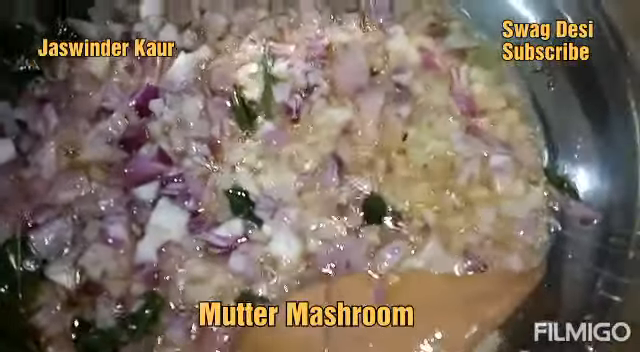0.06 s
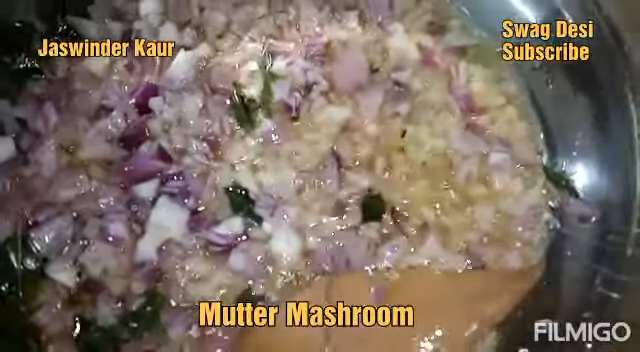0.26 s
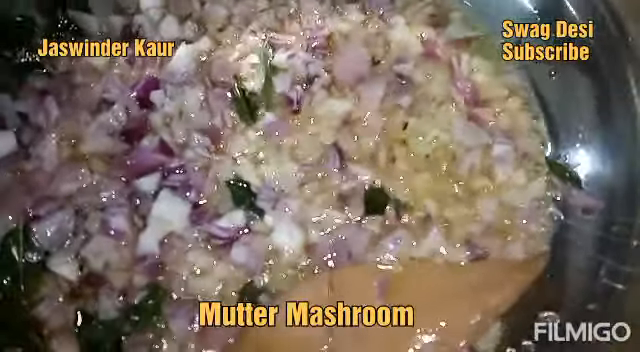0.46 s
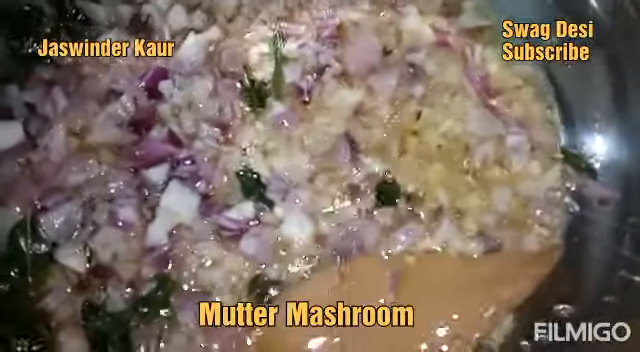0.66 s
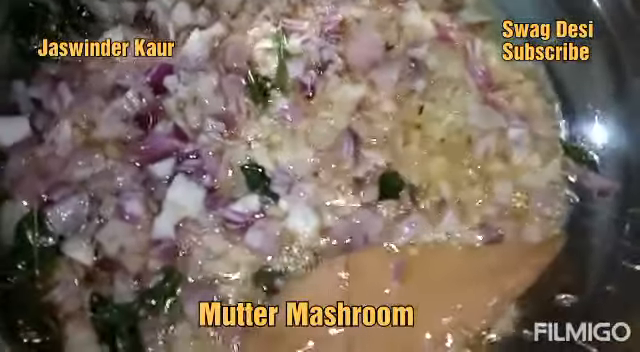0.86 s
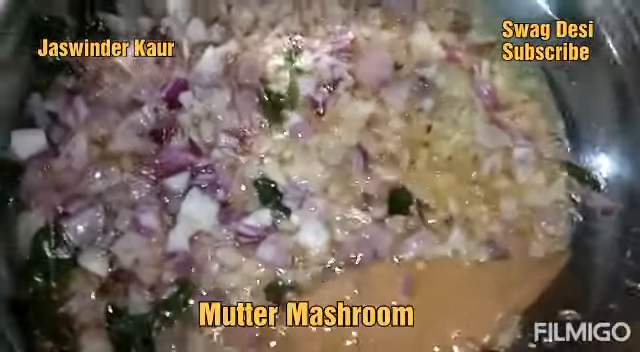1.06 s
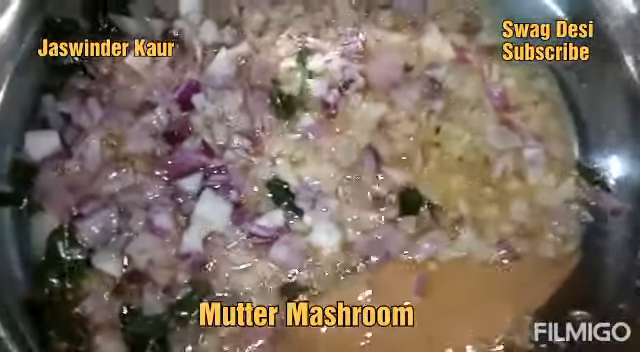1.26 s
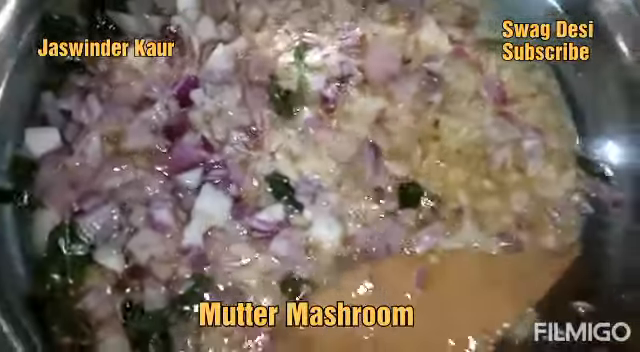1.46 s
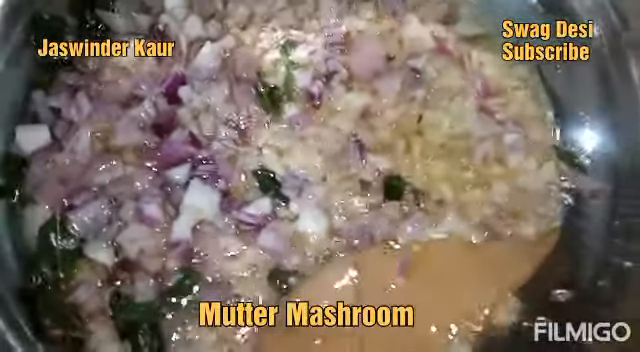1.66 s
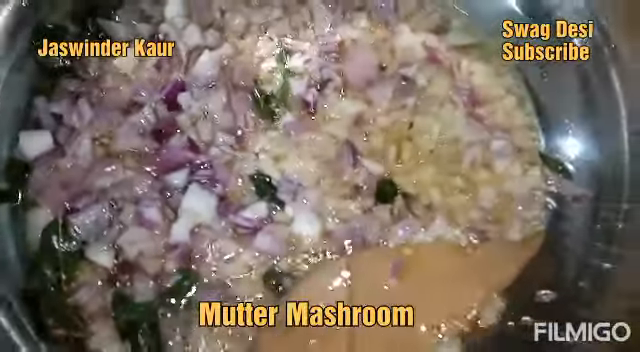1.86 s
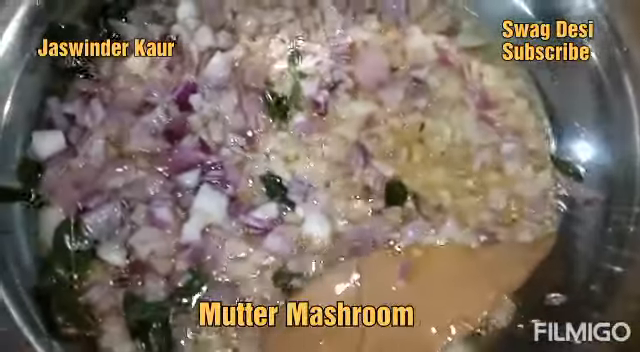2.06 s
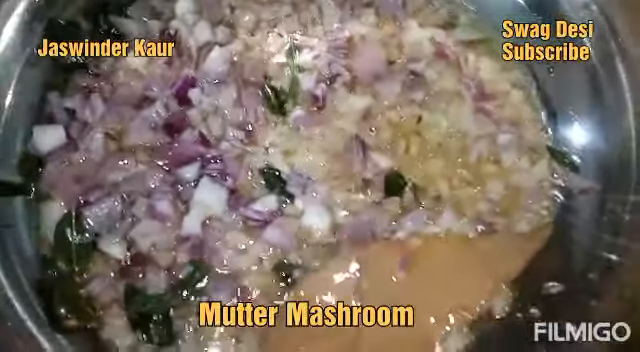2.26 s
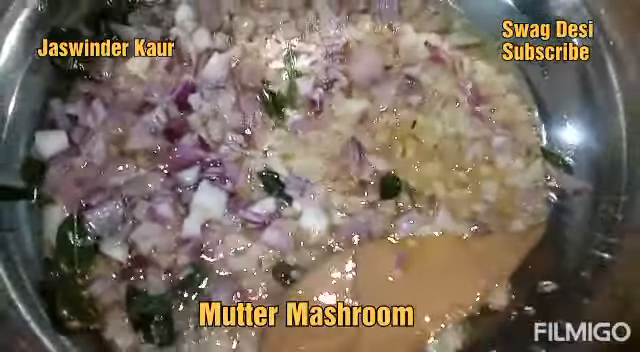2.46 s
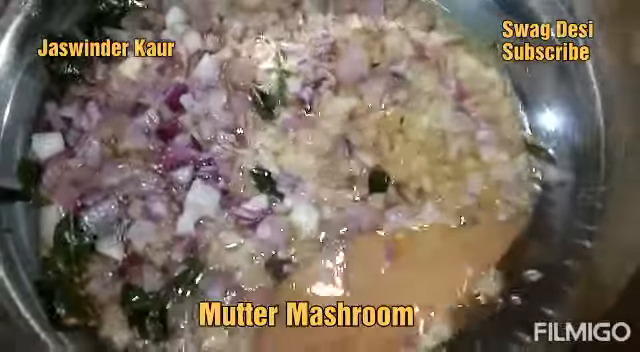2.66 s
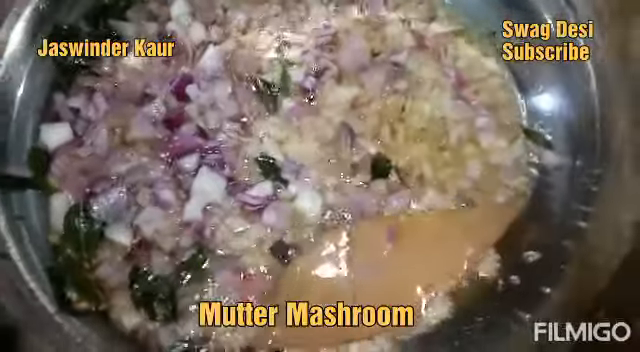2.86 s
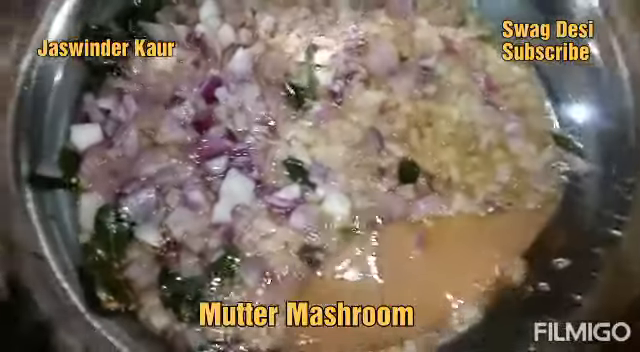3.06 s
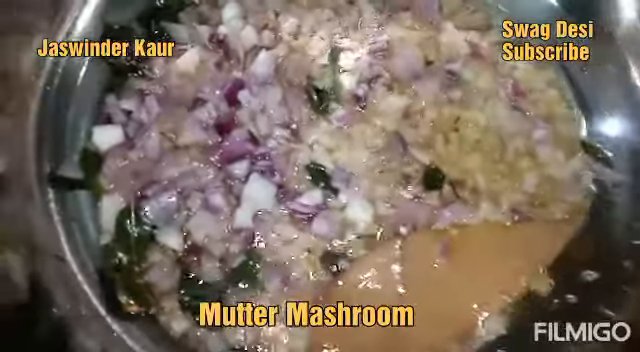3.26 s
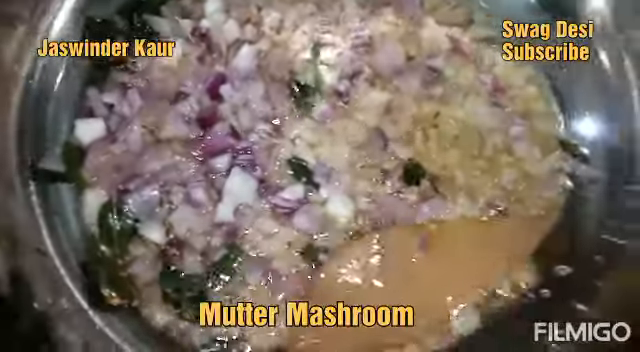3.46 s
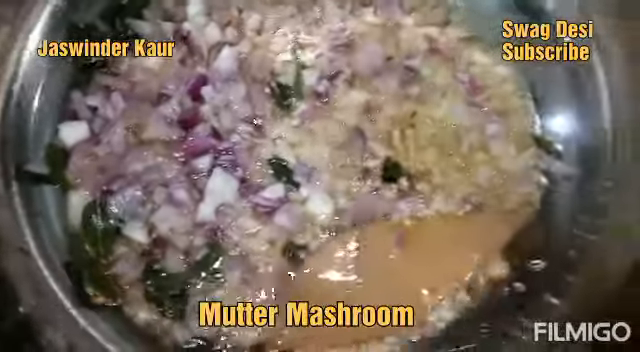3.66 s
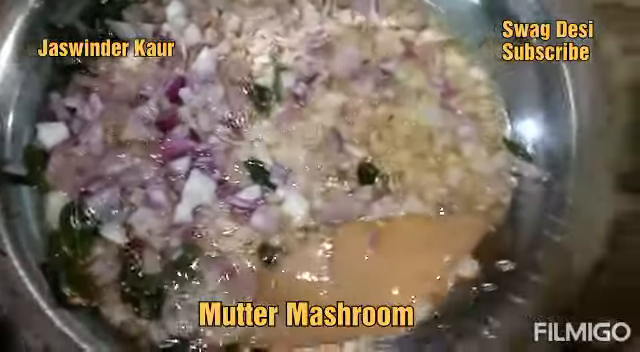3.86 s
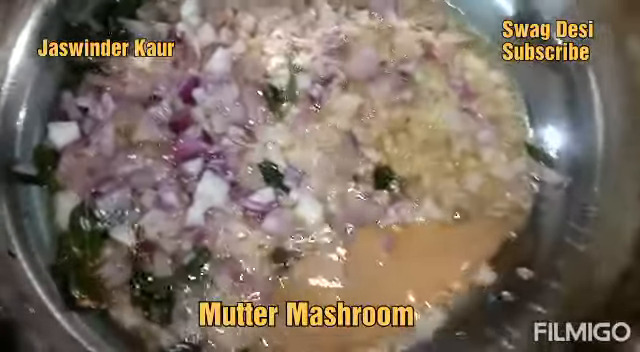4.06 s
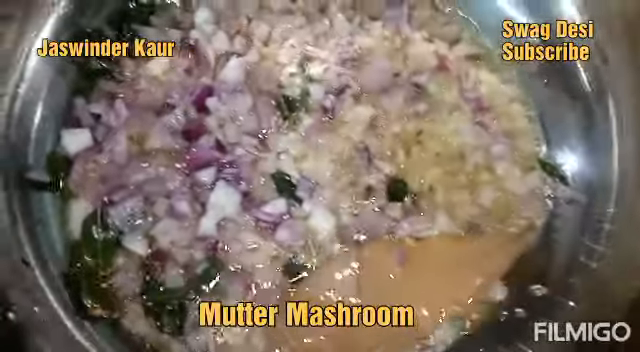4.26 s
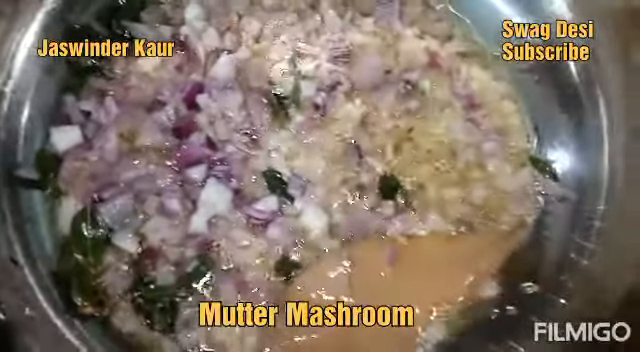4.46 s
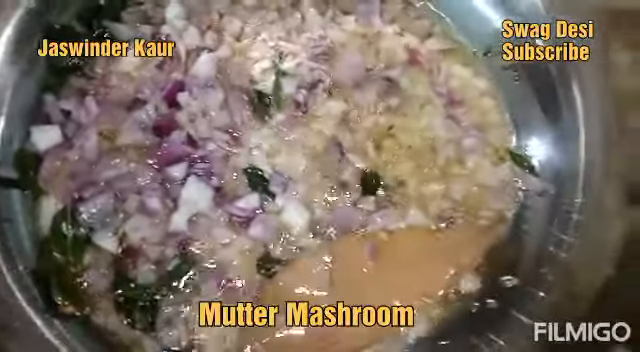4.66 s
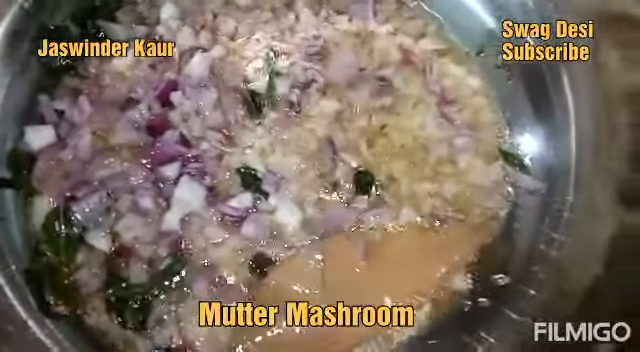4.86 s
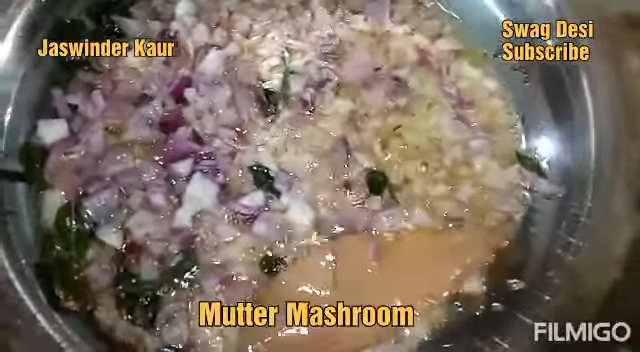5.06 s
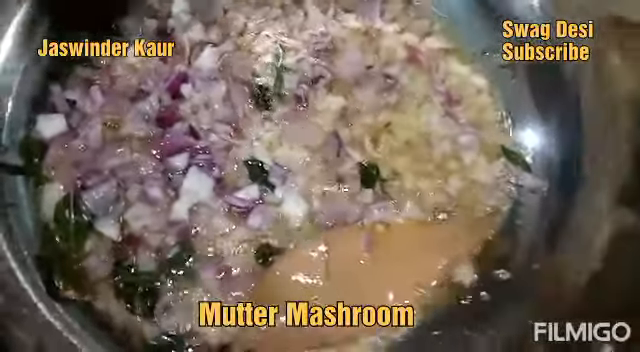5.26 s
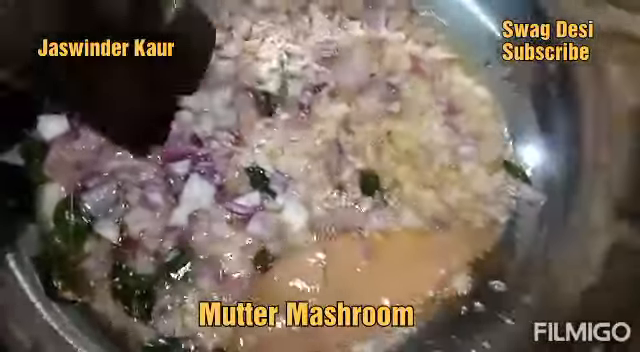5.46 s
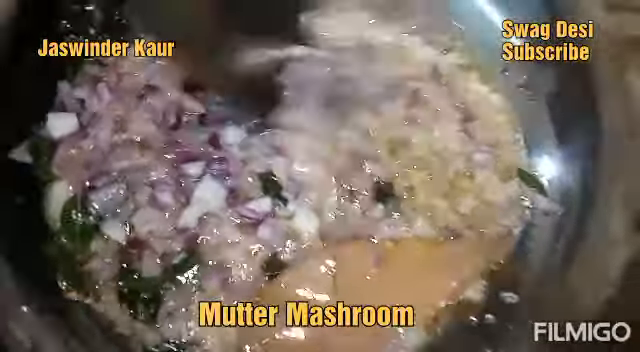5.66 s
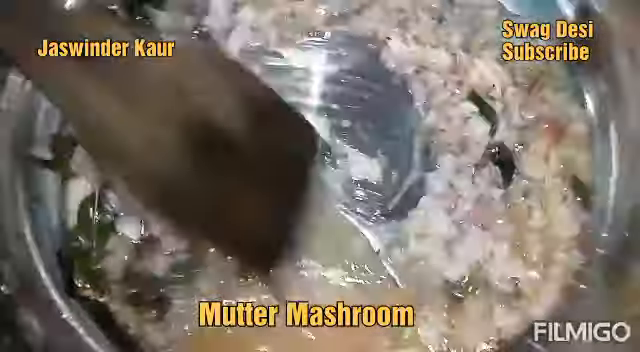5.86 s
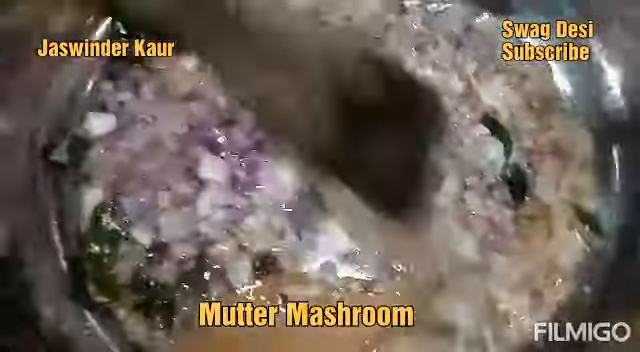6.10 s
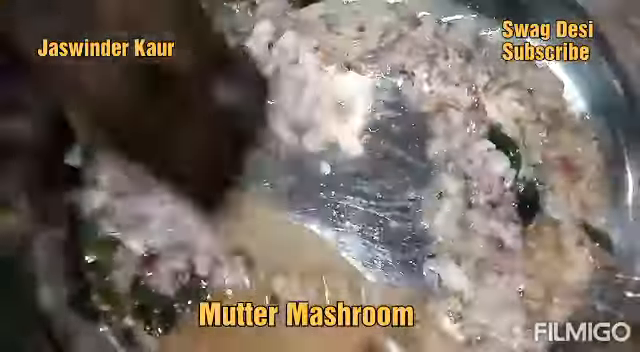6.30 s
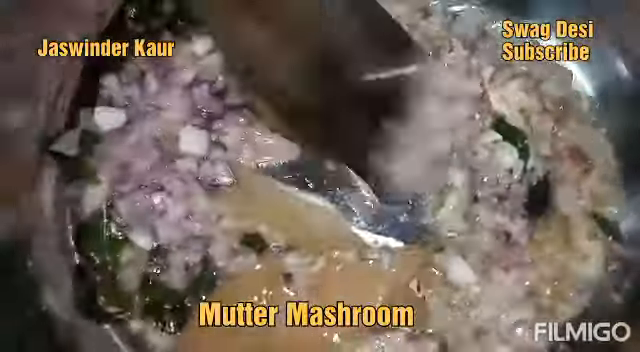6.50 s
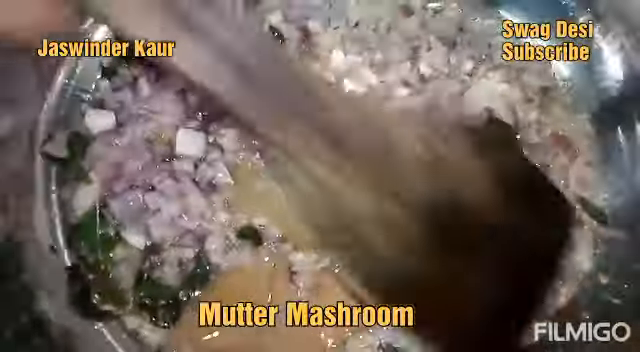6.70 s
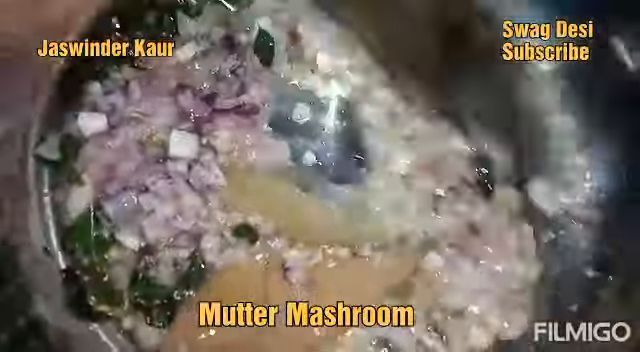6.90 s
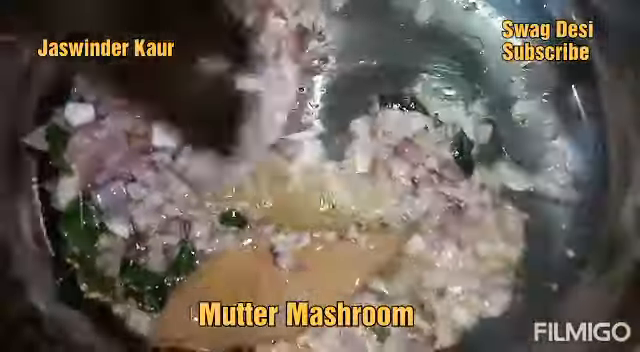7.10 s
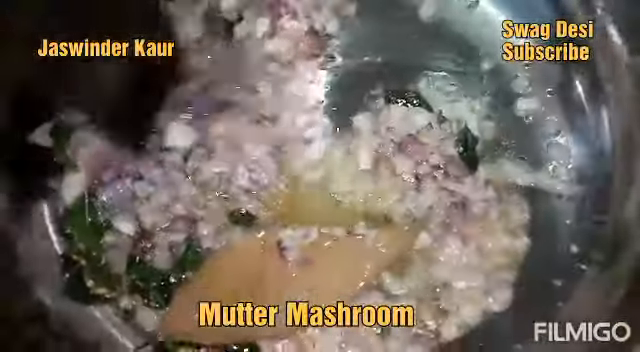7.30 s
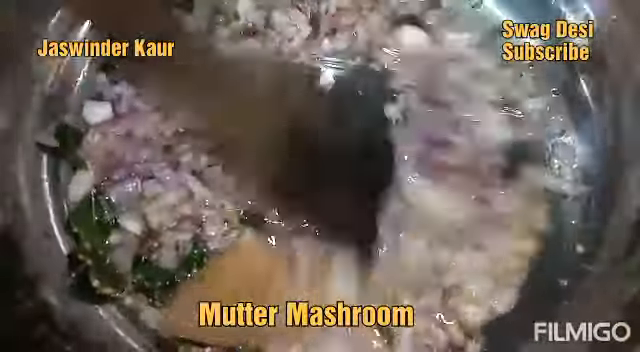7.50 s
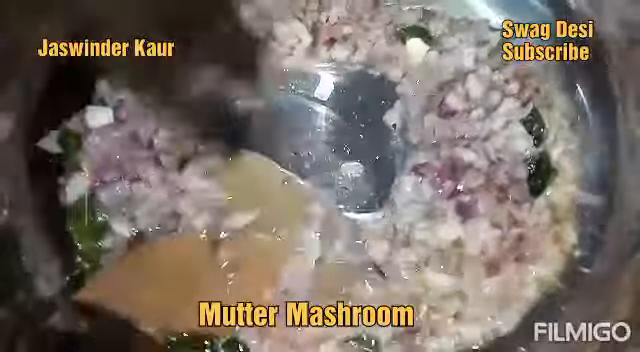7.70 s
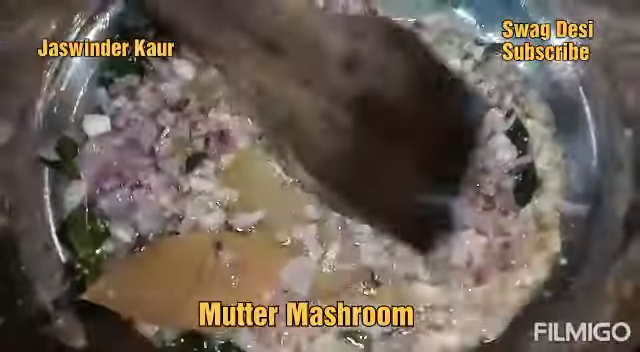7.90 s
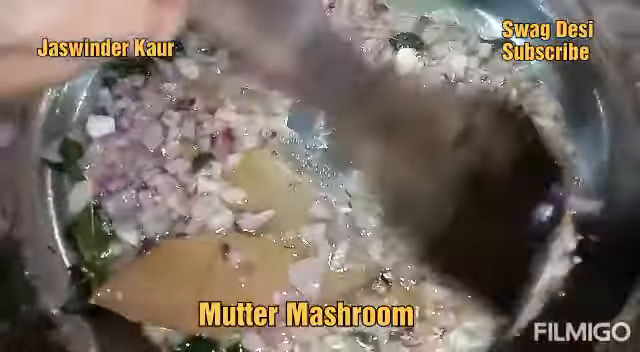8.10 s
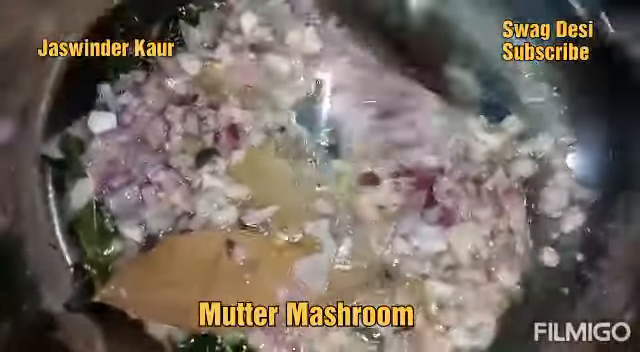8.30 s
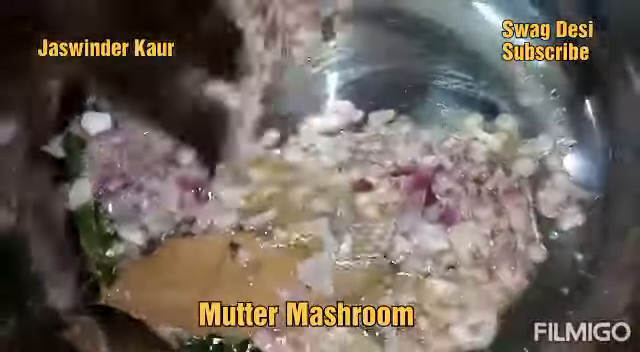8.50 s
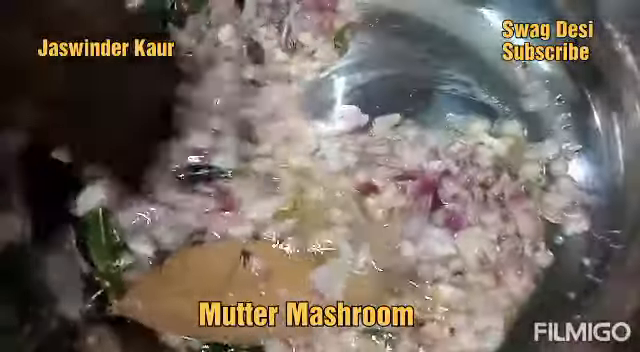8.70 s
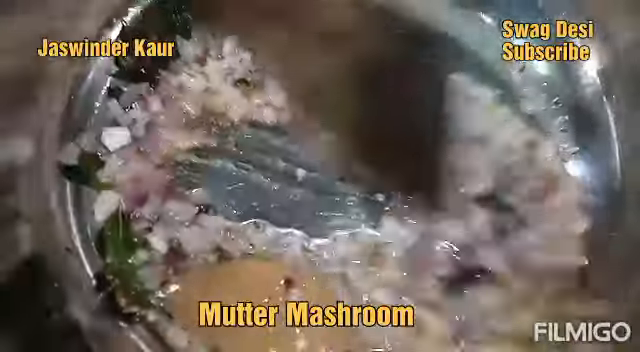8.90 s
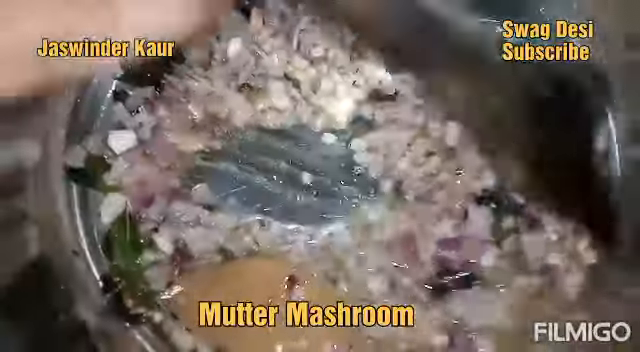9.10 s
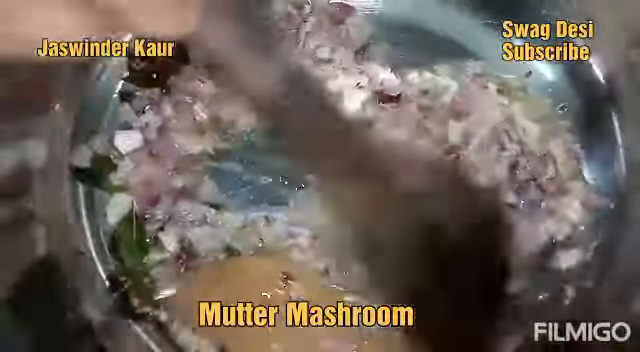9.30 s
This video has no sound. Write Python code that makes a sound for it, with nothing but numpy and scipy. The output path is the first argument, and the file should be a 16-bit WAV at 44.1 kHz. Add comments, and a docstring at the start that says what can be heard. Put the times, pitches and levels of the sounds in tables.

```python
"""Onions frying in a steel pot

Chopped onions fry in oil, heard from just above the rim: noise-and-ring bursts make the sizzle and spitting
drops, rising sine blips the bubbles. The pot is bumped softly on its burner (booming sine, rumbling noise) and
knocked (decaying modes, thud), a utensil clinks. Then a wooden spatula stirs: the sizzle flares as wet onion
meets hot metal, and the spatula scrapes (coloured noise, ringing slips) and knocks the pot again."""
import sys
import numpy as np
from scipy import signal
from scipy.fft import rfft, irfft
from scipy.io import wavfile

SR = 44100
rng = np.random.default_rng(int(sys.argv[2]) if len(sys.argv) > 2 else 0)


def digitize_waveform(pressure):
    """Quantize a signal to 16-bit integers and store it at the path in sys.argv[1].

    Rows of a 2-D input are taken as channels; values are limited to [-1, 1].
    """
    field = np.atleast_2d(pressure).T
    bounded = np.clip(field, -1, 1)
    quanta = np.round(bounded * 32767).astype(np.int16)
    wavfile.write(sys.argv[1], SR, quanta)


N = 411894
TIME = np.arange(N) / SR

# spatula strokes: (start [s], length [s], flaring sizzle [dB], fine spray [dB], rubbing [dB],
#                   wet squelch [dB], left minus right [dB])
STIRRING = [(5.49, 0.2, -44, -61, -60.5, -60, 0), (5.668, 0.29, -34, -66, -58.5, -48.5, -1),
            (6.035, 0.23, -31.5, -68, -54.5, -51, -2), (6.238, 0.22, -30, -58, -54, -45, 0.5),
            (6.415, 0.27, -28.5, -57, -47, -38, -0.5), (6.68, 0.29, -37.5, -68, -46.5, -40, -5.5),
            (6.881, 0.3, -30.5, -45, -42.5, -71, 1.5), (7.15, 0.2, -36, -58, -71, -40.5, 8),
            (7.447, 0.38, -31.5, -50, -50.5, -43, -3), (7.872, 0.14, -37, -50.5, -54, -61, -3.5),
            (8.193, 0.075, -38.5, -53, -49, -51, -7), (8.403, 0.27, -36.5, -63, -55, -56, -2.5),
            (8.726, 0.12, -35, -62, -42.5, -36, -4.5), (9.185, 0.094, -40, -50, -58.5, -71, -8)]


def from_db(db):
    """Decibels to gain."""
    return 10 ** (np.asarray(db) / 20)


def sides(level_db, left_minus_right_db):
    """Gains of left and right, as a column."""
    return from_db(level_db + left_minus_right_db * np.array([[.5], [-.5]]))


def rms_one(x):
    """Scale to rms 1."""
    return x / np.sqrt(np.mean(x ** 2) + 1e-20)


def at_hz(points, hz):
    """Read a spectrum in dB on a log-frequency axis."""
    f, db = np.transpose(points)
    return np.interp(np.log(np.maximum(hz, 1)), np.log(f), db)


def drift(per_s):
    """Random wander: straight lines between normal draws of spread 1, so many per second."""
    knots = rng.standard_normal(4096)
    return np.interp(TIME * per_s, np.arange(len(knots)), knots)


def colour(x, points, size=4096):
    """Causal (minimum-phase) filter with the given spectrum, made by folding its cepstrum."""
    hz = np.fft.rfftfreq(size, 1 / SR)
    cepstrum = irfft(np.log(from_db(at_hz(points, hz))))
    cepstrum[1:size // 2] *= 2
    cepstrum[size // 2 + 1:] = 0
    response = irfft(np.exp(rfft(cepstrum)))
    return signal.oaconvolve(x, response[None], axes=-1)[:, :x.shape[1]]


def stereo_noise(side_db, size):
    """White noise, alike on both sides but for a side part."""
    mid, side = rng.standard_normal((2, size))
    return mid + from_db(side_db) * side * np.array([[1], [-1]])


def fade(t, t60):
    """Exponential decay, 60 dB in t60 seconds."""
    return from_db(-60 * t / t60)


def add(out, s, sound):
    """Mix a sound in at a time in seconds."""
    at = max(round(s * SR), 0)
    out[:, at:at + sound.shape[1]] += sound[:, :N - at]


def burst(hz, cycles, ring_db, wall_db, wall_t60, size=3000):
    """One bursting bubble: a snap, ringing (60 dB down after `cycles`), scatter between steel walls; energy 1."""
    t = TIME[:size]
    phase = rng.uniform(0, np.pi, (2, 1))
    snap = rms_one(rng.standard_normal((2, size)) * fade(t, 0.00051))
    ring = rms_one(np.sin(2 * np.pi * hz * t + phase) * fade(t, cycles / hz))
    walls = rms_one(rng.standard_normal((2, size)) * fade(t, wall_t60))
    return rms_one(snap + from_db(ring_db) * ring + from_db(wall_db) * walls) / np.sqrt(size)


def crackle(per_s, spread_db, biggest, clump_db, low_hz, high_hz, cycles, ring_db, wall_db, count=10):
    """Bubbles of uneven strength burst at random, swelling together, at spots of different pitch; rms 1."""
    born = np.flatnonzero(rng.random(N) < per_s / SR)
    sizes_db = spread_db * np.minimum(rng.exponential(1, len(born)), biggest)
    sizes_db = sizes_db + clump_db * drift(45)[born]
    sizes = from_db(sizes_db) * rng.choice([-1, 1], len(born))
    spot = rng.integers(0, count, len(born))
    out = np.zeros((2, N), np.float32)
    for k, hz in enumerate(np.geomspace(low_hz, high_hz, count)):
        clicks = np.zeros((1, N), np.float32)
        clicks[0, born[spot == k]] = sizes[spot == k]
        bubble = burst(hz, cycles, ring_db, wall_db, wall_t60=0.069, size=1600)
        out += signal.oaconvolve(clicks, bubble.astype(np.float32), axes=-1)[:, :N]
    return rms_one(out)


def blips(per_s, low_hz, high_hz, cycles, rise, spread_db):
    """Pockets of steam open; each rings briefly, its pitch rising by 2 * rise over its t60; rms 1."""
    out = np.zeros((2, N))
    for when, pitch, strength, phase in rng.random(size=(5000, 4))[:int(per_s * N / SR)]:
        hz = low_hz * (high_hz / low_hz) ** pitch
        life_s = cycles / hz
        t = TIME[:int(life_s * SR)]
        turns = hz * t * (1 + rise * t / life_s) + phase
        ring = np.sin(2 * np.pi * turns) * fade(t, life_s) * (1 - np.exp(-t * hz))
        add(out, when * N / SR, from_db(spread_db * strength ** 2) * ring[None])
    return rms_one(out)


def simmer(gain):
    """The steady fine sizzle of onions lying in oil: dense, tiny bubble bursts."""
    # (frequency [Hz], level [dB])
    simmer_spectrum = [(300, -36.5), (600, -19.5), (1500, -14), (2000, -9.5), (2800, -2), (3300, 1.5),
                       (4300, -1.5), (6200, 0), (7200, -6.5), (8100, -15.5), (9800, -13.5), (11500, -33),
                       (15500, -92)]
    bubbles = crackle(per_s=7000, spread_db=3.2, biggest=6.2, clump_db=1.0, low_hz=2740, high_hz=6800,
                      cycles=34.0, ring_db=-6, wall_db=4.5)
    return gain * rms_one(colour(bubbles, simmer_spectrum))


def stove():
    """The low murmur of burner and kitchen: coloured noise of wandering level."""
    # (frequency [Hz], level per Hz [dB])
    murmur_spectrum = [(25, -38), (70, -9.5), (140, -7), (200, -19.5), (300, -14), (430, -17.5), (600, -2),
                       (730, -17.5), (1050, -23), (1200, -3.5), (1500, -23.5), (3000, -58)]
    level_db = -66 + 1.8 * drift(7)
    return from_db(level_db) * rms_one(colour(stereo_noise(side_db=-2.5, size=N), murmur_spectrum))


def bubbling():
    """Larger, slower bubbles in the pool of oil: patches of small ones and single plops."""
    # big bubbles: (time [s], level [dB], pitch [Hz])
    big_bubbles = [(0.452, -45, 1650), (0.989, -44, 800), (1.04, -49, 640), (1.202, -47, 708),
                   (1.634, -47, 860), (2.865, -43, 1100), (2.985, -51, 900), (4.235, -48, 610),
                   (4.405, -45, 1200), (5.345, -42.5, 1000), (9.258, -41, 746)]
    pool_db, swing_db, swings_per_s = -69, 1, 7
    pool = blips(per_s=110, low_hz=540, high_hz=1500, cycles=40, rise=.015, spread_db=9)
    out = from_db(pool_db) * rms_one(pool * from_db(swing_db * drift(swings_per_s)))
    for s, level_db, hz in big_bubbles:
        plop = burst(hz, cycles=25, ring_db=-12, wall_db=-2, wall_t60=.11, size=5000)
        plop = colour(plop, [(hz / 4, -36), (hz / 1.4, -3), (hz, 0), (hz * 1.5, -5), (hz * 4, -28), (hz * 8, -50)])
        add(out, s, from_db(level_db) * plop / np.abs(plop).max())
    return out


def bumps(size=22000):
    """Each soft rock makes the loaded bottom boom until it seats again, while the burner frame rumbles."""
    # rocks of the pot: (time [s], boom level [dB], boom pitch [Hz], rumble level [dB], rumble t60 [s])
    rocks = [(0.001, -42, 334, -49.5, 0.74), (0.228, -47, 336, -64, .1), (0.523, -41, 335, -54.5, 1),
             (0.724, -29.5, 332, -42, 0.62), (0.767, -28, 331, -41.5, 0.6), (0.806, -46, 331, -40.5, 0.43),
             (0.904, -42, 331, -64, 0.17), (1.252, -36, 331, -47, 0.7), (1.349, -43, 334, -50, 0.3)]
    # (frequency [Hz], level [dB])
    rumble_spectrum = [(20, -12), (60, -0.5), (130, 0.5), (200, -7.5), (270, 0), (380, 2), (480, -9.5),
                       (600, -6), (750, -19), (1150, -14), (1600, -19.5), (4000, -50)]
    boom_t60_s, hold_s, swell_s = 0.1, 0.019, 0.0021
    tail_db, tail_t60_s = -18, 0.62   # the bottom rings on faintly
    out, t = np.zeros((2, N)), TIME[:size]
    dying = fade(np.maximum(t - hold_s, 0), boom_t60_s) + from_db(tail_db) * fade(t, tail_t60_s)
    swell = 1 - np.exp(-t / swell_s)
    for s, boom_db, hz, rumble_db, rumble_t60_s in rocks:
        boom = np.sin(2 * np.pi * hz * t) * dying
        rumble = rms_one(colour(stereo_noise(side_db=-7.0, size=size), rumble_spectrum)) * fade(t, rumble_t60_s)
        add(out, s, swell * (from_db(boom_db) * boom + from_db(rumble_db) * rumble))
    return out


def knocks(size=44000):
    """A blow wakes the modes near its own pitch (low if soft, high if hard), with a thud that dies in the room."""
    # blows: (time [s], ring level [dB], thud level [dB], centre [Hz], spread [octaves], reach to far modes [dB],
    #         sharp first impact [dB], swell [s], multiple of each mode's t60 [-], delay until a touch muffles it [s])
    blows = [(0.012, -39, -54, 125, 0.3, -50, -20, 0.01, 1, .16),
             (0.21, -52.5, -46, 443, 0.23, -50, -2, 0.0018, 1, .03),
             (0.245, -47, -59, 525, 0.075, -50, -18, 0.0059, 1, .02),
             (4.52, -37, -46.5, 157, 0.19, -45, -2, 0.011, 1, .3),
             (6.462, -45.5, -40, 680, 0.75, -50, -13, 0.0024, 1, 0.24),
             (6.8905, -26.5, -19.5, 502, 0.66, -18, 1, 0.00043, 1.8, 0.36),
             (7.4179, -80, -27, 2600, 0.26, -51, -17, 0.00026, 1, .1),
             (7.441, -39, -45, 147, 0.48, -50, -18, 0.03, 1.3, 0.24),
             (8.225, -50.5, -47, 208, 0.52, 2, -20, 0.032, 1, 0.35),
             (8.366, -29, -26.5, 420, 0.62, -50, -7, 0.0037, .9, .39),
             (8.759, -13, -27.5, 1995, 0.14, -18, 0, 0.00057, .95, .5),
             (8.768, -60, -31.5, 370, 0.76, -50, -29, 0.0091, 1, .2)]
    # modes of the pot: (frequency [Hz], level [dB], t60 [s])
    pot_modes = [(122, -13, .9), (205, -14, .6), (331, -8, .35), (345, -5.5, .95), (533, -13, .22),
                 (575, -4.5, .25), (818, -11.5, 1.3), (1061, -18, .7), (1087, -16, .7), (1351, -6, .9),
                 (1884, 0, .3), (2110, -17, .45), (2595, -9, .26), (3122, -10, .26), (3865, -2, .3),
                 (4890, 8, .14), (4935, 12, .34), (5717, -1, .3)]
    # (frequency [Hz], level per Hz [dB])
    thud_spectrum = [(30, -7), (110, 9.5), (230, -3.5), (340, -1), (430, -14), (600, 1), (740, -8.5),
                     (1100, -3), (1500, -4), (2000, -22), (5000, -5), (9000, -20), (15000, -33)]
    least_split_hz, twin_db = 7.04, -10.5   # modes lie in close pairs that beat
    muffled_t60_s = .3
    out, t = np.zeros((2, N)), TIME[:size]
    hz, mode_db, t60 = np.transpose(pot_modes)
    phase = (2 * np.pi * hz[:, None] * t).astype(np.float32)
    grid = np.geomspace(30, 16000, 80)
    dying = fade(t, 0.031) + from_db(-2.5) * fade(t, 0.39)
    for s, ring_db, thud_db, centre_hz, octaves, far_db, impact_db, swell_s, stretch, free_s in blows:
        reach_db = np.maximum(-4.3 * (np.log2(grid / centre_hz) / octaves) ** 2, -50)
        woken = from_db(np.maximum(np.interp(hz, grid, reach_db), far_db))
        split_hz = least_split_hz * (1 + rng.random((len(hz), 1)))
        twin = np.cos((phase + 2 * np.pi * split_hz * t).astype(np.float32))
        pairs = np.sin(phase) + from_db(twin_db) * twin
        ring = (woken * from_db(mode_db)) @ (pairs * fade(t, stretch * t60[:, None]))
        ring = ring * fade(np.maximum(t - free_s, 0), muffled_t60_s)
        contact = 1 - np.exp(-t / swell_s)
        push = stereo_noise(side_db=-6.5, size=size) * dying * contact
        push[:, 0] += from_db(impact_db) * np.linalg.norm(dying)   # the blow itself, ahead of its echoes
        thud = rms_one(colour(push, np.c_[grid, reach_db + at_hz(thud_spectrum, grid)]))
        thud = thud * np.sqrt(np.mean(dying ** 2))
        add(out, s, from_db(ring_db) * contact * ring + from_db(thud_db) * thud)
    return out


def spits(sizzle):
    """Water drops blow up singly, each coloured around its pitch; lesser ones are random and grow with the sizzle."""
    # the loudest drops: (time [s], peak level [dB], pitch [Hz], left minus right [dB])
    loudest = [(0.1731, -21, 3900, 0), (0.2947, -26, 5490, -2), (0.452, -28, 2500, -4),
               (0.736, -21, 3800, 2), (0.89, -29, 2900, 0), (1.139, -26, 3180, -3),
               (1.2276, -19.5, 3530, -3), (1.335, -29, 2400, -3), (1.6585, -22, 3400, -1),
               (1.9991, -21, 5360, -9), (2.4772, -22, 4310, -4), (2.557, -26, 4200, 0),
               (2.651, -27, 5120, 0), (3.0826, -22, 5380, 7), (3.168, -27, 5700, 1), (3.379, -25, 2920, -2),
               (3.519, -24, 4400, 2), (3.616, -23, 5150, -1), (4.4084, -19, 4000, 6),
               (4.6898, -22, 4030, -4), (4.748, -24, 3190, -3), (4.998, -26, 4000, 0),
               (5.4945, -21, 4600, 2), (5.5251, -17, 4500, -7), (5.605, -19, 4600, 0),
               (5.6662, -15, 5410, -11), (5.7157, -8, 4090, -10), (5.932, -18, 3060, 0),
               (6.065, -16, 3150, -5), (6.301, -13, 3200, 0), (6.347, -14, 2700, 0), (6.366, -12, 4300, 0),
               (6.394, -10, 3720, 4), (6.4358, -9, 4290, -1), (6.611, -12, 4500, 0), (6.7203, -7, 5800, 0),
               (6.7943, -12, 4620, 0), (7.0624, -6, 4950, -3), (7.073, -12, 3200, -4),
               (7.0995, -13, 6370, 3), (7.1648, -9, 4710, -2), (7.2978, -11, 3200, 2),
               (7.3472, -12, 3210, 3), (7.4195, -12, 2900, 2), (7.431, -14, 2500, 2), (7.438, -17, 2300, 2),
               (7.4655, -14, 3120, -3), (7.9093, -10, 6150, 0), (8.0288, -15, 5660, 3),
               (8.511, -18, 4500, 0), (8.549, -21, 5520, 0), (8.9026, -18, 3110, -4),
               (8.9887, -18, 4720, -3), (9.19, -16, 4000, -3)]
    # (frequency [Hz], level [dB])
    spit_spectrum = [(80, -34), (400, -18.5), (1400, -4), (2800, 1.5), (4300, 1.5), (6200, 10), (8100, -4),
                     (9800, -6.5), (12000, -12), (15500, -82)]
    lesser_per_s, over_sizzle_db, spread_db = 24, 9.5, 1.8
    out = np.zeros((2, N))
    grid = np.geomspace(80, 16000, 40)
    lesser = []
    for _ in range(int(lesser_per_s * N / SR)):
        at = rng.integers(0, N)
        a, b, c = rng.standard_normal(3)
        peak_db = 20 * np.log10(sizzle[at]) + over_sizzle_db + spread_db * a
        lesser.append((at / SR, peak_db, 4400 * 2 ** (0.51 * np.tanh(b)), 3 * c))
    for s, peak_db, hz, pan_db in loudest + lesser:
        focus_db = np.maximum(-7 * np.log2(grid / hz) ** 2, -7)
        pop = burst(hz, cycles=12, ring_db=-3, wall_db=-3.5, wall_t60=.08)
        pop = colour(pop, np.c_[grid, at_hz(spit_spectrum, grid) + focus_db])
        pop = pop / np.abs(pop).max(axis=1, keepdims=True)
        add(out, s, sides(peak_db, pan_db) * pop)
    return out


def jets(size=16000):
    """Steam squeezed from under the onion sputters and excites the gap it escapes through; each hiss swells and dies."""
    # pitched hisses: (time [s], length [s], level [dB], pitch [Hz], width [Hz])
    hisses = [(1.472, 0.27, -56, 605, 22), (3.05, 0.035, -46, 4500, 1990), (4.67, 0.11, -40.5, 4180, 700),
              (5.7132, 0.0065, -17.5, 3700, 900), (5.719, 0.11, -33.5, 2980, 700),
              (6.289, 0.09, -30, 3150, 800), (6.426, 0.076, -39, 5100, 2500),
              (6.819, 0.066, -29, 3600, 900), (6.895, 0.3, -32, 5940, 596), (7.167, 0.0058, -19, 4600, 450),
              (7.428, 0.099, -35, 2860, 505), (7.817, 0.086, -47.5, 1000, 198),
              (8.223, 0.09, -44.5, 1170, 112), (8.218, 0.075, -45, 1800, 152)]
    out, t = np.zeros((2, N)), TIME[:size]
    for s, length_s, level_db, hz, width_hz in hisses:
        steps = np.repeat(rng.standard_normal(size), 100)[:size]   # level held for 100 samples at a time
        sputter = stereo_noise(side_db=-3, size=size) * from_db(3.0 * steps)
        r = np.exp(-np.pi * width_hz * np.sqrt(2) / SR)
        gap = [1, 0, -1, 1, -2 * r * np.cos(2 * np.pi * hz / SR), r * r]   # two-pole resonance, used twice
        swell = np.sqrt(np.abs(np.sin(np.pi * np.clip(t / length_s, 0, 1))))
        add(out, s, from_db(level_db) * swell * rms_one(signal.sosfilt([gap, gap], sputter)))
    return out


def clink(size=22000):
    """A utensil lands beside the pot and rattles to rest; each mode has its own level at each microphone."""
    # modes of the utensil: (frequency [Hz], level [dB], t60 [s])
    utensil_modes = [(327, -7, 0.56), (373, -20, 0.3), (450, -15, 0.22), (532.6, -4.5, 0.3),
                     (816, -22, 0.18), (1280, -16, 0.19), (1460, -24, 0.33), (2114, -20, 0.48),
                     (2600, -6, 0.14), (2630, -14, 0.11), (3530, -3, 0.13), (3810, -0.5, 0.3),
                     (4660, 3, 0.11)]
    # touches: (time after landing [s], level [dB])
    touches = [(0, 0), (.011, -5), (.033, -8.5), (.074, -15)]
    # (frequency [Hz], level [dB])
    clunk_spectrum = [(30, -80), (120, -54), (250, -5), (340, 20.5), (520, 5), (680, -2), (900, 7),
                      (1100, -16), (1370, 11), (1800, -13), (2500, 10), (3100, -35), (3800, 1), (4700, 8),
                      (9000, -33), (15000, -42)]
    landing_s, level_db = 2.2003, -28.5
    out, t = np.zeros((2, N)), TIME[:size]
    for delay_s, bounce_db in touches:
        ring = np.zeros((2, size))
        for hz, db, t60 in utensil_modes:
            mode_gain = from_db(db + rng.normal(0, 1 + hz / 1500, (2, 1)))
            ring += mode_gain * np.sin(2 * np.pi * hz * t) * fade(t, t60)
        ring = ring * (1 - np.exp(-t / .001))
        clunk = colour(stereo_noise(side_db=-4, size=size) * fade(t, .13), clunk_spectrum)
        clunk = clunk / np.abs(clunk).max()
        touch = from_db(-7) * ring + from_db(6) * clunk
        add(out, landing_s + delay_s, from_db(level_db + bounce_db) * touch)
    return out


def nudge(size=14000):
    """Small scuffing slips crowd to a peak and fall away as the pot settles on the burner."""
    # modes the slips wake: (frequency [Hz], level [dB], t60 [s])
    slip_modes = [(248, -7, 0.1), (430, -11, 0.06), (575, -13, 0.2), (1003, -1, 0.054), (1100, -11, .1),
                  (1340, -17, .06)]
    # base over grate: (frequency [Hz], level [dB])
    scuff_spectrum = [(90, -24), (200, 3), (290, 1), (360, -7), (460, -3), (650, -1), (780, -12), (1000, 2),
                      (1250, -4), (1700, -18), (4000, -45)]
    peak_s, level_db, scuff_db = 5.01, -39.5, -2.5
    rise_s, fall_s = .014, .016   # time constants
    out, t = np.zeros((2, N)), TIME[:size]
    for offset_s in np.arange(-.044, .05, .008) + rng.normal(0, .0025, size=12):
        strength = np.exp(min(offset_s / rise_s, -offset_s / fall_s))
        ring = np.zeros(size)
        for hz, db, t60 in slip_modes:
            ring += from_db(db + rng.normal(0, 4.1)) * np.sin(2 * np.pi * hz * t) * fade(t, t60)
        scuff = rms_one(colour(stereo_noise(side_db=-8, size=size), scuff_spectrum)) * fade(t, 0.16)
        add(out, peak_s + offset_s, from_db(level_db) * strength * (ring + from_db(scuff_db) * scuff))
    return out


def stroke_gain(levels_db, t60):
    """Every stroke swells at its place in the pot, holds while the spatula moves, then dies away; powers add."""
    attack_s = 0.03
    power = np.zeros((2, N))
    t = TIME[:2 * SR]
    for (start_s, length_s, *_, pan_db), level_db in zip(STIRRING, levels_db):
        gain = np.minimum(t / attack_s, 1) * fade(np.maximum(t - length_s, 0), t60)
        add(power, start_s, (sides(level_db, pan_db) * gain) ** 2)
    return np.sqrt(power)


def flare(gain, spray_gain):
    """Turned onion hits hot steel: coarser crackle in uneven surges, with a fine, fitful spray on top."""
    # (frequency [Hz], level [dB])
    flare_spectrum = [(400, -24.5), (1400, -11.5), (2000, -10), (2800, 1), (3400, 3.5), (4800, 2.5),
                      (5400, 3), (6200, 3), (7200, -5), (8100, -15), (9500, -70), (11500, -25),
                      (15500, -72)]
    # (frequency [Hz], level [dB])
    spray_spectrum = [(5000, -101), (8200, -2), (9500, 7), (10700, -1), (12000, -9), (15000, -23)]
    surge_db, surges_per_s = 1.0, 14
    flicker_db, flickers_per_s = 2, 24
    bubbles = crackle(per_s=6500, spread_db=4.5, biggest=4.3, clump_db=1.4, low_hz=2190, high_hz=6130,
                      cycles=18.4, ring_db=-2.0, wall_db=0.5)
    spray = crackle(per_s=1500, spread_db=4.0, biggest=4.0, clump_db=2.5, low_hz=8000, high_hz=14000,
                    cycles=10, ring_db=-6, wall_db=3, count=4)
    surging = from_db(surge_db * drift(surges_per_s)) * colour(bubbles, flare_spectrum)
    fitful = from_db(flicker_db * drift(flickers_per_s)) * colour(spray, spray_spectrum)
    return gain * rms_one(surging) + spray_gain * rms_one(fitful)


def slips(size=2400):
    """The wooden edge sticks and slips unevenly; every slip rings the blade against the bottom; rms 1."""
    # resonances of blade and bottom: (frequency [Hz], level [dB], t60 [s])
    blade_modes = [(640, -8, .06), (1080, -2, .11), (1720, 0, .09), (2200, 0, .07)]
    slips_per_s, spread_db = 80, 1.5
    wander_octaves, wanders_per_s = .05, 7   # resonances shift as the blade travels
    out, t = np.zeros((2, N)), TIME[:size]
    count = int(slips_per_s * N / SR)
    when = rng.integers(0, N, size=count)
    chance = rng.standard_normal(size=(count, 5))   # one per mode, the last shared by all
    for k, (hz, db, t60) in enumerate(blade_modes):
        centre_hz = hz * 2 ** (wander_octaves * drift(wanders_per_s))
        dying = fade(t, t60)
        for at, luck in zip(when, chance):
            gain = from_db(db + spread_db * np.clip(luck[-1] + .5 * luck[k], -2, 2))
            add(out, at / SR, (gain * np.sin(2 * np.pi * centre_hz[at] * t) * dying)[None])
    return rms_one(out)


def scrape(rub_gain, squelch_gain):
    """Wood drags over the bottom, catching and freeing itself, and squeezes the wet onion."""
    # (frequency [Hz], level [dB])
    scrape_spectrum = [(40, -13), (110, -3), (250, -13), (450, -1), (620, -1), (780, -1.5), (1100, 2),
                       (1450, -1), (1900, -5), (3000, -30), (6000, -40)]
    catch_db, catches_per_s = 2.4, 32
    catching = from_db(catch_db * drift(catches_per_s))
    friction = stereo_noise(side_db=-3.5, size=N) * from_db(2.1 * drift(110))
    friction = rms_one(colour(friction, scrape_spectrum))
    mash = blips(per_s=150, low_hz=500, high_hz=1400, cycles=35, rise=.02, spread_db=12)
    rub = from_db(-2.5) * friction + from_db(-7) * mash + from_db(-4) * slips()
    squelch = blips(per_s=450, low_hz=1550, high_hz=2800, cycles=36, rise=.02, spread_db=10)
    return catching * (rub_gain * rub + from_db(-4.5) * squelch_gain * squelch)


def scene():
    """The onions simmer throughout; each stroke of the spatula scrapes and makes the sizzle flare."""
    simmer_db, sag_db_per_s = -42, 0.33   # undisturbed frying sinks as the onions dry
    turned_s, turned_rise_s, turned_db, turned_spray_db = 5.6, 0.18, -36, -55   # once turned, they fry harder
    flare_t60_s, spray_t60_s, rub_t60_s, squelch_t60_s = 0.74, 0.35, 1, 0.32   # decay after each stroke
    _, _, flare_db, spray_db, rub_db, squelch_db, _ = np.transpose(STIRRING)
    calm = from_db(simmer_db - sag_db_per_s * TIME)
    turned = np.clip((TIME - turned_s) / turned_rise_s, 0, 1)
    flaring = np.hypot(stroke_gain(flare_db, flare_t60_s), from_db(turned_db) * turned)
    spraying = np.hypot(stroke_gain(spray_db, spray_t60_s), from_db(turned_spray_db) * turned)
    sizzle = np.hypot(calm, flaring.mean(axis=0))
    frying = simmer(calm) + bubbling() + spits(sizzle) + jets() + flare(flaring, spraying)
    scraping = scrape(stroke_gain(rub_db, rub_t60_s), stroke_gain(squelch_db, squelch_t60_s))
    return frying + stove() + bumps() + knocks() + clink() + nudge() + scraping


def record(dry):
    """Each microphone has its own colour and the left hears a little later; the top is cut."""
    # how the microphones hear the pot: (frequency [Hz], left minus right [dB])
    balance = [(300, 1), (650, 1), (850, 2.5), (1400, -0.5), (2000, 3.5), (2900, 12), (4000, 5.5),
               (6000, 6), (7800, -3), (9600, 4), (10800, 7), (12000, -14.5), (15000, -24.5)]
    left_lag_s, cutoff_hz = .0001, 15600
    left = colour(dry[:1], [(hz, db / 2) for hz, db in balance])
    left = np.pad(left, ((0, 0), (round(left_lag_s * SR), 0)))[:, :N]
    right = colour(dry[1:], [(hz, -db / 2) for hz, db in balance])
    low_pass = signal.ellip(10, .1, 90, cutoff_hz, fs=SR, output="sos")
    return signal.sosfilt(low_pass, np.vstack([left, right]))


dry = scene()
out = record(dry)
digitize_waveform(out)
```